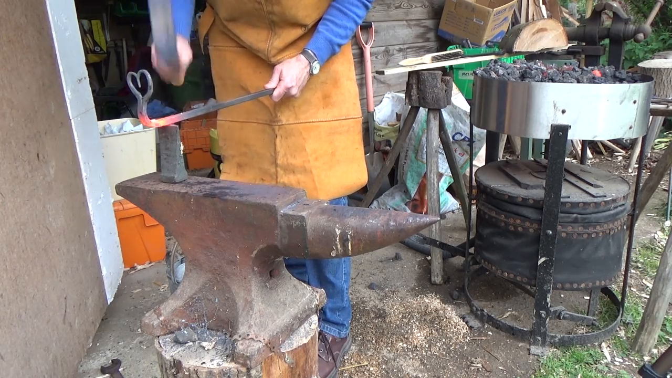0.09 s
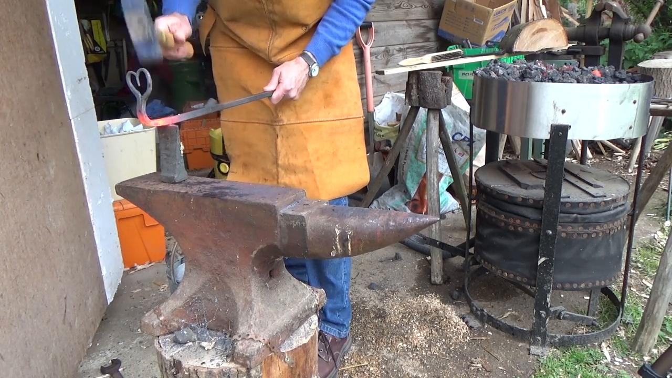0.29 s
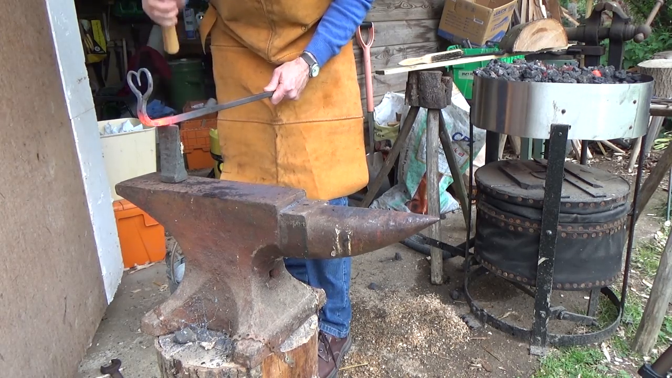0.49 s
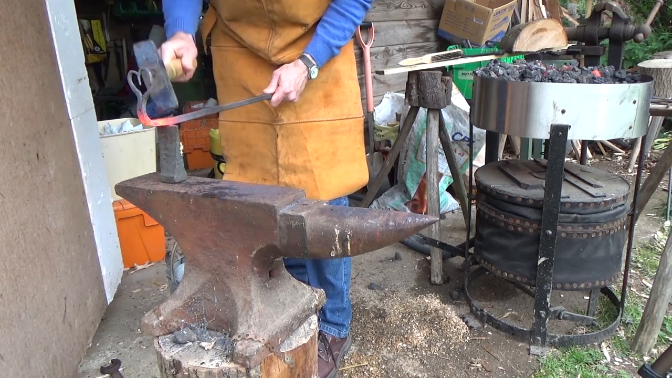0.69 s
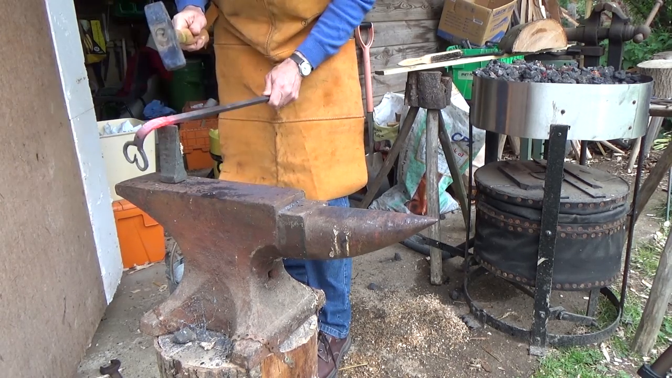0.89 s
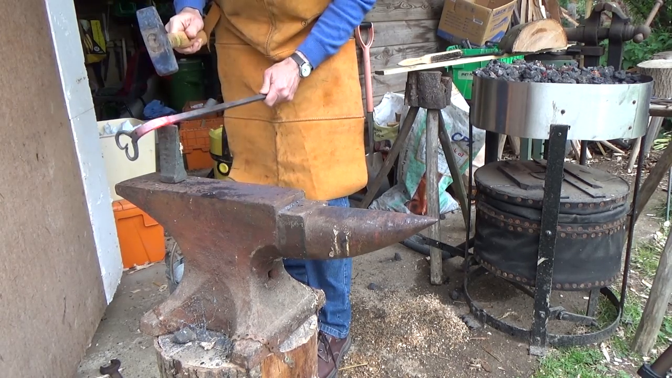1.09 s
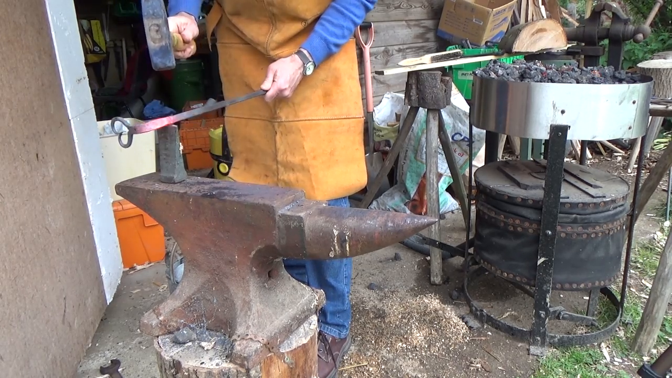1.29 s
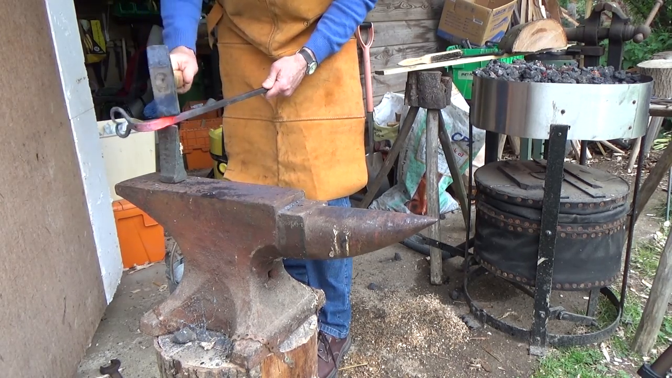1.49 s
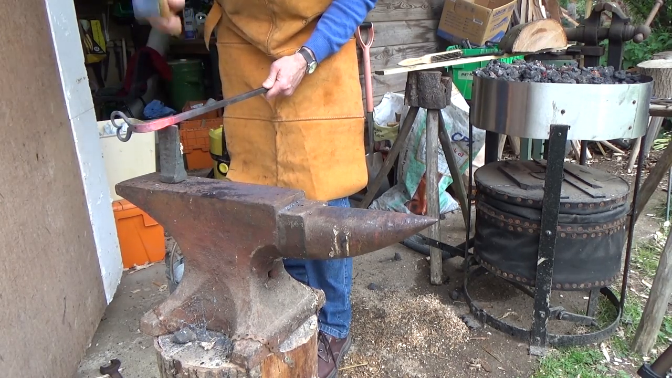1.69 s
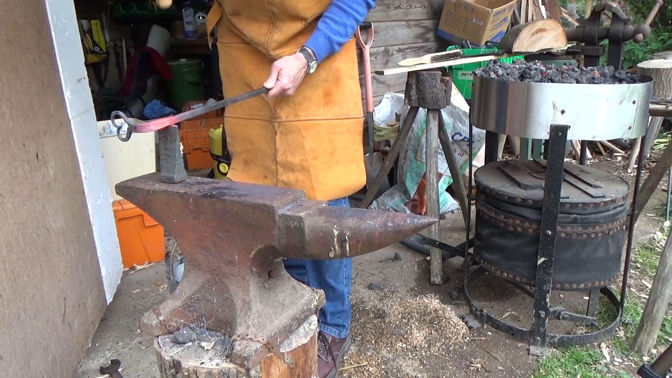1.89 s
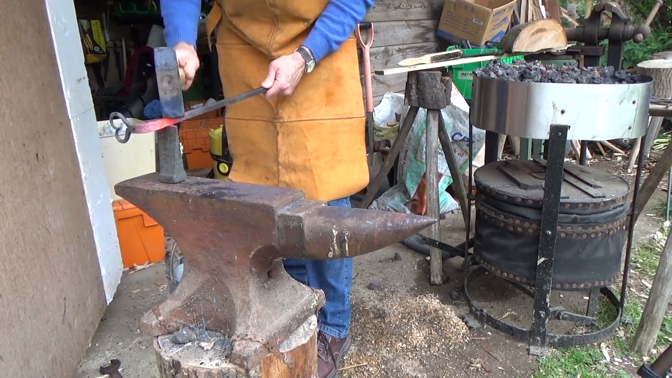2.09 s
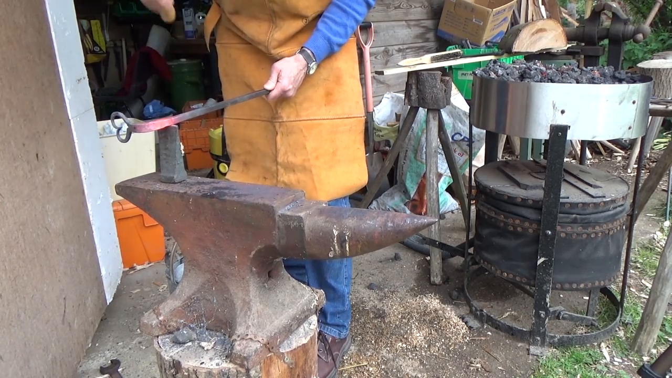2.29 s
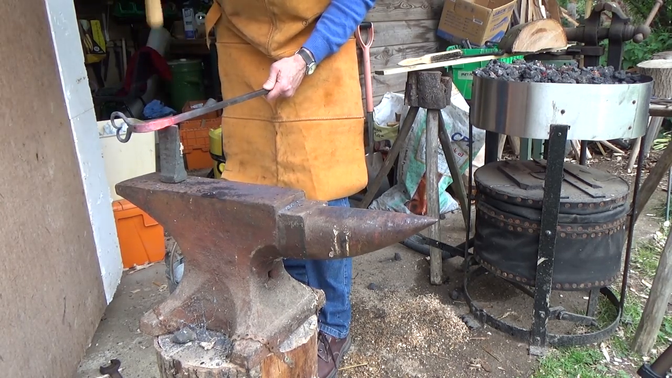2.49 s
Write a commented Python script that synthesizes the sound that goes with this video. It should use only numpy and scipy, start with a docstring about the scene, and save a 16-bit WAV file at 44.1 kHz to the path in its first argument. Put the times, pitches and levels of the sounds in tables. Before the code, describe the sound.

Hammer on hot steel over an anvil, outdoors, close stereo. A fading ring opens; bright clanging blows land at 0.2 and 0.7 s, with a small rebound at 0.74. At 0.84 the ringing cuts off abruptly, leaving soft air hiss and faint ticks. A duller, woody blow falls at 1.56, a bright ringing one at 2.1. Low thuds and faint yard echo follow; peaks sound flattened by limiting.

```python
"""Open-air forge, in stereo: hand hammer on hot steel, on a stake set in an anvil, over soft outdoor air.
It opens on the tail of an earlier blow; two blows follow, at 0.21 and 0.68 s, the second with a rebound.
A splice at 0.84 s cuts their ringing; faint noise ticks fill the pause while the piece is turned.
A duller blow falls at 1.56 s and a bright one at 2.10 s. Rings are decaying sines, the rest shaped noise:
clash, crack, knock and thud through the stump, late yard echo. The recorder's limiter holds all level."""
import sys
import numpy as np
from scipy import signal
from scipy.fft import rfft, irfft
from scipy.io import wavfile
from scipy.ndimage import uniform_filter1d, minimum_filter1d

SR = 44100
rng = np.random.default_rng(int(sys.argv[2]) if len(sys.argv) > 2 else 0)


def unload_wav(signal):
    """Save mono or channel-first audio to the path in sys.argv[1] as 16-bit WAV at rate SR, clipped to [-1, 1]."""
    wavfile.write(
        sys.argv[1],
        SR,
        np.round(np.clip(np.atleast_2d(signal).T, -1, 1) * 32767).astype(np.int16),
    )


N = 112455
T = np.arange(N) / SR  # s
HZ = np.fft.rfftfreq(N, 1 / SR)

# Spectra below give relative shape only: noise() sets the whole to rms 1.
# Stereo likeness of the noise at the microphone: f/Hz, left-right likeness/0-1
STEREO_LIKENESS = [(100, 1), (350, .99), (700, 0.92), (1300, 0.67), (2500, 0.73), (5000, 0.71),
                   (12000, 0.99)]
# Stereo lean: f/Hz, left minus right level/dB
STEREO_LEAN = [(100, 0), (380, .5), (700, 2.5), (1300, 1), (2000, 1), (2650, 5), (3400, -.3), (3900, .2),
               (4640, 2.2), (5320, 3), (5800, .4), (11000, 0)]
PHASE_RAD_PER_DB = 0.06  # each channel's ring phase lag per dB of its own lean

# Outdoor hiss and rumble: f/Hz, relative level/dB per Hz
AIR_SPECTRUM = [(15, -78), (25, -29), (80, 3.5), (166, -2.5), (206, -6), (476, -3), (607, -6), (659, -2.5),
                (714, -4.5), (1330, -8.5), (2280, -5), (5000, -13.5), (6210, -23), (11900, -23.5),
                (16000, -34)]
# Its course: t/s, rms level/dB
AIR_LEVEL = [(0, -45.5), (0.6, -48), (0.83, -48.5), (0.87, -52), (1.3, -52), (1.9, -49.5), (2.55, -48)]
AIR_PATCH_DB = 1.5  # rms depth of the drifting patches

# Small ticks in the pause: t/s, level/dB, tilt/dB per octave
TICK_EVENTS = [(0.8978, -40, -2.5), (1.058, -50, -6), (1.129, -37, 0), (1.236, -44.5, 3),
               (1.2968, -38.5, 0.5), (1.4143, -40.5, -10.5), (1.437, -34.5, -6), (1.5412, -35.5, -8)]
# Colour of a tick: f/Hz, relative level/dB per Hz
TICK_SPECTRUM = [(500, -34), (2500, -7), (4500, 2.5), (7000, -3), (12000, 5), (16000, -5)]
TICK_T60_S, TICK_TAIL_DB, TICK_TAIL_T60_S = 0.004, -16.5, 0.17

# The yard answers late and low: f/Hz, relative level/dB per Hz
ECHO_SPECTRUM = [(60, -11), (160, -7), (300, 7), (450, -6.5), (900, -10.5), (3000, -12), (9000, -27.5)]
ECHO_DB, ECHO_DELAY_S, ECHO_RISE_S, ECHO_T60_S = -36.5, 0.064, 0.07, 0.63

# Stump and ground: f/Hz, relative level/dB per Hz
THUD_SPECTRUM = [(30, -40), (55, -5), (85, 4), (140, 2.5), (220, 5), (350, -4.5), (1000, -28), (4000, -76)]
THUD_DB, THUD_RISE_S, THUD_T60_S = -16, 0.023, 0.21
# Knock of the stump: f/Hz, relative level/dB per Hz
KNOCK_SPECTRUM = [(100, -26.5), (230, 0.5), (340, 3.5), (460, -1.5), (560, -0.5), (720, -2.5), (1000, -3.5),
                  (1400, -20.5), (4000, -48)]
KNOCK_DB, KNOCK_T60_S = -5.5, 0.17

# Dense short ringing of hammer, bar and anvil: f/Hz, relative level/dB per Hz
CLASH_SPECTRUM = [(300, -13), (800, -16.5), (1250, -1), (1800, -2.5), (2600, 7.5), (3200, 3.5), (4300, 6.5),
                  (6000, -2.5), (7200, -6), (11000, -3), (13500, -12), (16000, -23)]
# Decay of the clash by band: f/Hz, t60/s
CLASH_T60 = [(300, 0.19), (1000, 0.15), (2200, 0.15), (4500, 0.16), (8000, 0.19), (15000, 0.067)]
CLASH_DB, CONTACT_RISE_S, CRACK_DB, CRACK_T60_S = -1, 0.00071, 3.5, 0.044

# Rough song of the loosely held bar: f/Hz, relative level/dB per Hz
BAR_SPECTRUM = [(1500, -70), (2500, -28), (2610, -10), (2640, 0), (2665, 0), (2695, -15), (2800, -30),
                (4500, -70)]
BAR_DB, BAR_T60_S = -35, 0.55

# Anvil mode pitches: f/Hz
ANVIL_HZ = [1534, 1647, 3445, 3843, 5323, 5863, 7022, 7180, 7942, 8549, 8742, 9360, 9540, 9994, 10533,
            11035, 11550, 12545, 15352]
# Anvil modes, same order: t60/s before the length factor, level/dB struck at spot 0, level/dB at spot 1
ANVIL_MODES = [(.48, -9.5, -11.5), (0.25, -1.5, -4.5), (0.25, -14, -4), (0.73, -21, -10.5), (0.27, -7, -5),
               (.45, -3.5, -8), (0.24, -22, -38), (0.25, -62, -10), (0.45, -21, -12), (0.15, -33, -42),
               (0.34, -45, -8), (0.18, -19, -5), (.24, -29, -18), (0.64, -27, -19), (0.22, -32, 5),
               (0.32, -30, -22), (0.23, -17.5, -4), (0.38, -36.5, -19), (.5, -53, -24)]
# Stake mode pitches: f/Hz
STAKE_HZ = [2644, 2662, 3567, 4639, 4770, 5813, 6324, 7640, 12026, 13275]
# Stake modes, same order: t60/s before the length factor, level/dB struck at spot 0, level/dB at spot 1
STAKE_MODES = [(0.18, 1, -17), (0.19, 4.5, -10.5), (0.3, -6.5, -16), (0.44, -13.5, -21), (0.2, -14.5, -11),
               (0.44, -6.5, -13), (0.22, -11.5, -12), (.22, -17.5, -12.5), (0.56, -24.5, -52),
               (0.27, -20, -38)]
RING_RISE_S, STAKE_LENGTH = 0.013, 0.79  # the length factor multiplies each t60

# Hammer blows, levels relative to each layer: t/s, strike spot/0-1, anvil ring/dB, stake and bar ring/dB,
# ring tilt/dB per octave, anvil length factor, clash and crack/dB, clash tilt/dB per octave,
# knock/dB, thud/dB, echo/dB
BLOWS = [(-0.27, 0.7, -3, -13, 9, 0.78, -2, 0, 0, -4, -4),
         (0.2058, 0.2, 1.5, 11, 1, 0.74, 4.5, 3.5, 1.5, 2, 6),
         (0.6842, 0.08, 4, 4, 2, 0.81, 0, 1.5, -2, -4, 3.5),
         (1.5602, 0.57, -15, -24, -2, 0.87, -12, -3, -9.5, -1.5, 2.5),
         (2.1026, 0.81, -1, 10.5, 1, 0.91, 3.5, 1, 2.5, 2, 2)]
# The hammer drops back on the work: t/s, level/dB
REBOUNDS = [(0.738, -10.5)]
SPLICE_S, SPLICE_FADE_S = 0.8435, 0.0014

# Recorder: threshold, share of the excess taken off, fall rate of the detected level, upper band edge
LIMIT_DB, LIMIT_SLOPE, RECOVER_DB_PER_S, EDGE_HZ = -14.5, 0.92, 254, 16200


def amp(db):
    """Decibels to gain."""
    return 10 ** (np.asarray(db) / 20)


def unit(x):
    """Scales to rms 1."""
    return x / np.sqrt(np.mean(x ** 2) + 1e-20)


def read(points, hz):
    """Joins points by straight lines on a log-frequency axis."""
    f, value = np.transpose(points)
    return np.interp(np.log(hz + 1), np.log(f), value)


def octaves(hz):
    """Octaves from 4 kHz, the pivot of every tilt; constant below 500 Hz."""
    return np.log2(np.maximum(hz, 500) / 4000)


def add(mix, s, sound):
    """Mixes a sound in at time s; a negative time leaves only its later part."""
    at = round(s * SR)
    start = max(at, 0)
    sound = sound[:, max(-at, 0):N - start]
    mix[:, start:start + sound.shape[1]] += sound


def noise(spectrum, tilt_db=0):
    """Coloured stereo noise of rms 1, with the likeness and lean of the two channels."""
    a, b = rfft(rng.standard_normal((2, N)))
    same = np.clip(read(STEREO_LIKENESS, HZ), 0, 1)
    pair = np.array([a, same * a + np.sqrt(1 - same ** 2) * b])
    pair = pair * amp(np.outer([0.5, -0.5], read(STEREO_LEAN, HZ)))
    colour = amp(read(spectrum, HZ) + tilt_db * octaves(HZ))
    return unit(irfft(pair * colour, N))


def fade(t60, t=T):
    """Exponential decay, 60 dB down after t60 seconds."""
    return np.exp(-np.log(1000) * t / t60)


def rise(seconds):
    """Smooth attack with this time constant."""
    return 1 - np.exp(-T / seconds)


def die_away(x, t60s):
    """Lets each band decay at its own speed, as damping varies with pitch."""
    hz, t, bands = signal.stft(x, SR, nperseg=256)
    bands = bands * fade(read(t60s, hz)[:, None], t)
    return signal.istft(bands, SR, nperseg=256)[1][:, :N]


def air():
    """Soft outdoor hiss and rumble, whose level drifts in patches of time and pitch."""
    bands = signal.stft(noise(AIR_SPECTRUM), SR, nperseg=1024)[2]
    patches = rng.standard_normal(bands.shape[1:])
    patches = uniform_filter1d(patches, size=12, axis=0)  # across pitch
    patches = unit(uniform_filter1d(patches, size=8, axis=1))  # across time
    wash = signal.istft(bands * amp(AIR_PATCH_DB * patches), SR, nperseg=1024)[1][:, :N]
    return unit(wash) * amp(np.interp(T, *np.transpose(AIR_LEVEL)))


def ticks():
    """Tiny bright ticks with a short tail, as the bar is shifted on the stake."""
    out = np.zeros((2, N))
    decay = fade(TICK_T60_S) + amp(TICK_TAIL_DB) * fade(TICK_TAIL_T60_S)
    for s, db, tilt_db in TICK_EVENTS:
        add(out, s, amp(db) * noise(TICK_SPECTRUM, tilt_db) * decay)
    return out


def yard_echo(db):
    """Diffuse answer of the yard: low noise that swells late and dies slowly."""
    return amp(ECHO_DB + db) * noise(ECHO_SPECTRUM) * rise(ECHO_RISE_S) * fade(ECHO_T60_S)


def thud(db):
    """Low, slow-rising push of the blow through stump and ground."""
    return amp(THUD_DB + db) * noise(THUD_SPECTRUM) * rise(THUD_RISE_S) * fade(THUD_T60_S)


def knock(db):
    """Woody knock of the stump, quick to rise with the contact."""
    return amp(KNOCK_DB + db) * noise(KNOCK_SPECTRUM) * rise(CONTACT_RISE_S) * fade(KNOCK_T60_S)


def contact(db, tilt_db):
    """Steel meets steel: a short crack over a clash of dense modes that decay by band."""
    clash = amp(CLASH_DB) * die_away(noise(CLASH_SPECTRUM, tilt_db), CLASH_T60)
    crack = amp(CRACK_DB) * noise(CLASH_SPECTRUM, tilt_db) * fade(CRACK_T60_S)
    return amp(db) * (clash + crack) * rise(CONTACT_RISE_S)


def bar(db):
    """The loosely held bar sings roughly: narrow noise whose tail flutters."""
    return amp(BAR_DB + db) * noise(BAR_SPECTRUM) * rise(RING_RISE_S) * fade(BAR_T60_S)


def ring(pitches, modes, spot, tilt_db, length):
    """Steel modes as decaying sines; the strike spot sets how strongly each one sounds."""
    out = np.zeros((2, N))
    t = T[:SR]  # one second holds the ring
    for hz, (t60, first_db, second_db) in zip(pitches, modes):
        lean_db = read(STEREO_LEAN, hz) * np.array([[0.5], [-0.5]])
        phase = 2 * np.pi * rng.random() - PHASE_RAD_PER_DB * lean_db
        spot_db = first_db + spot * (second_db - first_db)
        level = amp(spot_db + tilt_db * octaves(hz) + lean_db)
        out[:, :SR] += level * fade(t60 * length, t) * np.sin(2 * np.pi * hz * t + phase)
    return out * rise(RING_RISE_S)


def blow(spot, anvil_db, stake_db, ring_tilt_db, length, clash_db, clash_tilt_db, knock_db, thud_db, echo_db):
    """One blow sets anvil, stake, bar and stump sounding together; the yard answers after a delay."""
    out = amp(stake_db) * ring(STAKE_HZ, STAKE_MODES, spot, ring_tilt_db, STAKE_LENGTH)
    out += amp(anvil_db) * ring(ANVIL_HZ, ANVIL_MODES, spot, ring_tilt_db, length)
    out += bar(stake_db)
    out += contact(clash_db, clash_tilt_db)
    out += knock(knock_db) + thud(thud_db)
    add(out, ECHO_DELAY_S, yard_echo(echo_db))
    return out


def hammer():
    """All blows and the rebound; whatever rings at the splice stops there."""
    before, after = np.zeros((2, 2, N))
    for s, *row in BLOWS:
        add(before if s < SPLICE_S else after, s, blow(*row))
    for s, db in REBOUNDS:
        add(before, s, amp(db) * noise(CLASH_SPECTRUM, tilt_db=-5) * fade(CRACK_T60_S))
    splice_gain = np.clip((SPLICE_S - T) / SPLICE_FADE_S + 0.5, 0, 1)
    return before * splice_gain + after


def scene():
    """Open air, ticks and hammer."""
    return air() + ticks() + hammer()


def record(dry):
    """A fast limiter flattens each blow, so the ring swells as the clash dies; then the band limit."""
    power = uniform_filter1d((dry ** 2).mean(0), size=130)
    power_db = 10 * np.log10(abs(power) + 1e-12)
    # the detected level jumps up at once and falls at a steady rate
    recovery = RECOVER_DB_PER_S * T
    detected_db = np.maximum.accumulate(power_db + recovery) - recovery
    over_db = np.maximum(detected_db - LIMIT_DB, 0)
    # gain dips are widened, then smoothed
    gain_db = LIMIT_SLOPE * uniform_filter1d(minimum_filter1d(-over_db, size=60), size=40)
    low_pass = signal.firwin(401, EDGE_HZ, window=("kaiser", 9), fs=SR)
    return signal.oaconvolve(dry * amp(gain_db), low_pass[None], "same")


dry = scene()
out = record(dry)
unload_wav(out)
```